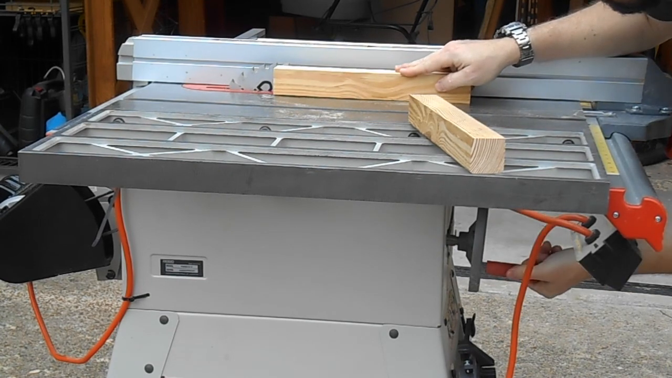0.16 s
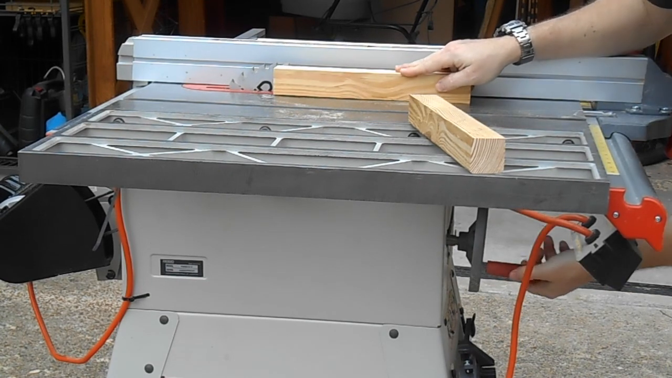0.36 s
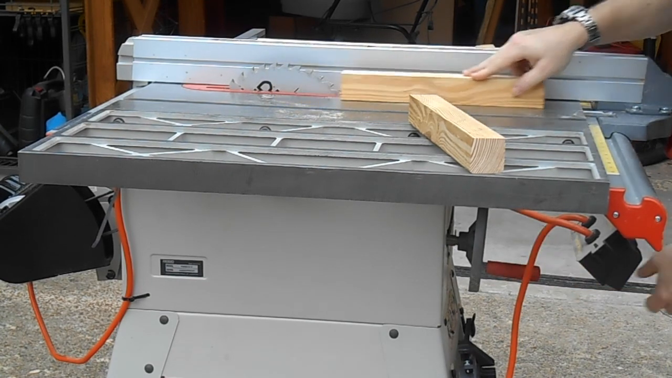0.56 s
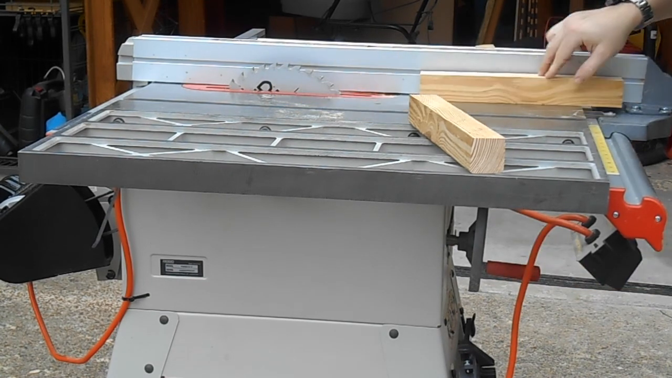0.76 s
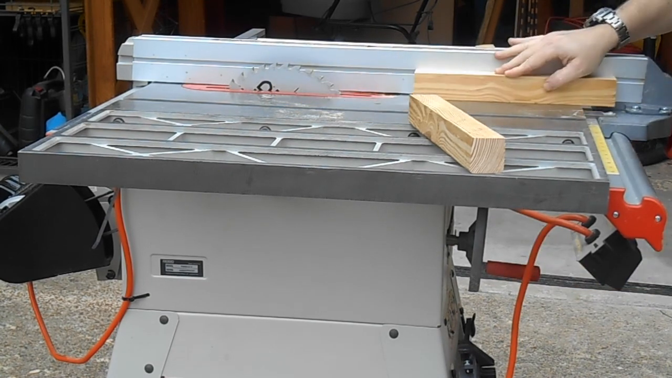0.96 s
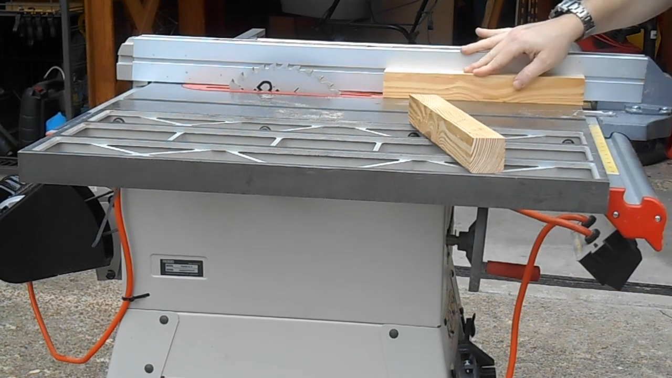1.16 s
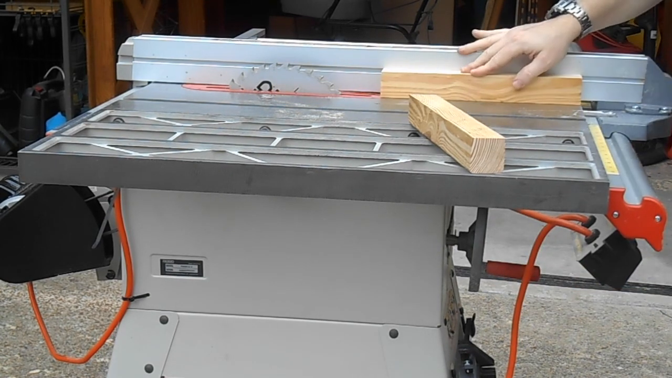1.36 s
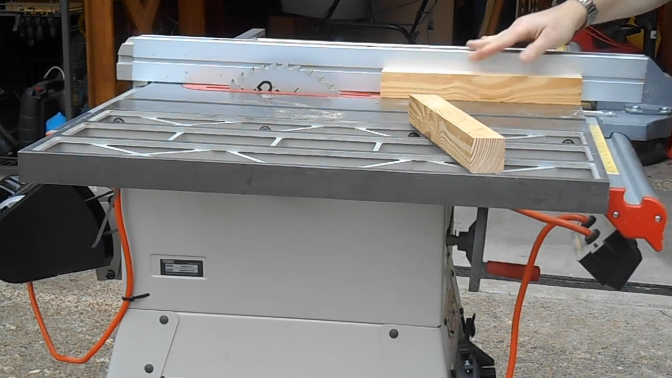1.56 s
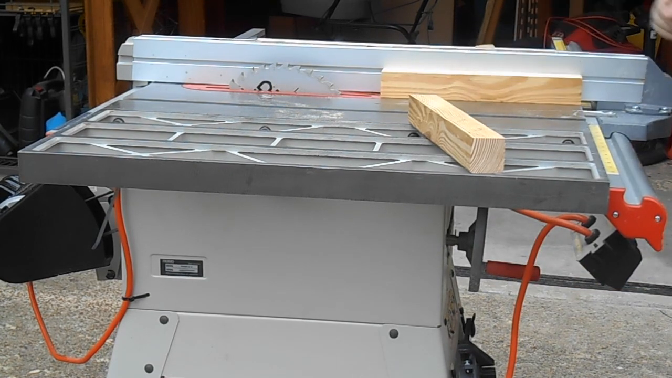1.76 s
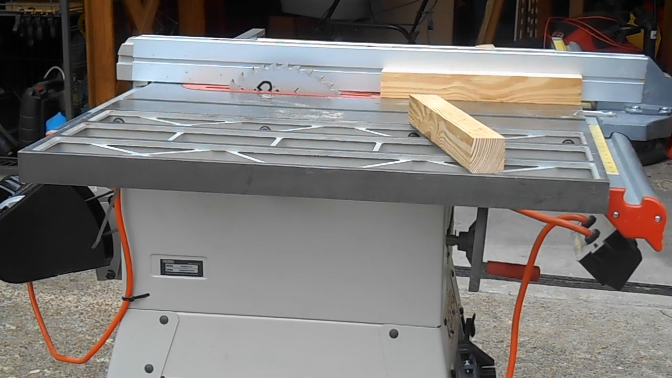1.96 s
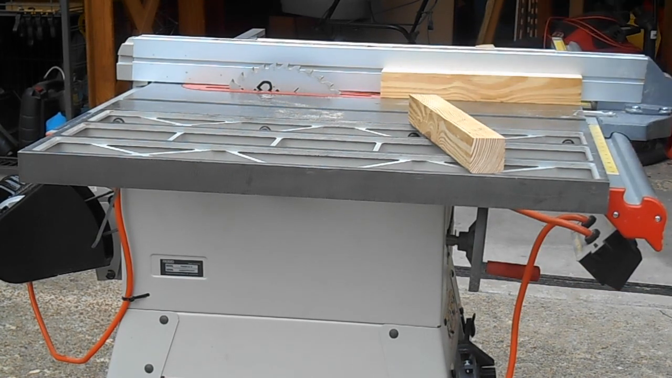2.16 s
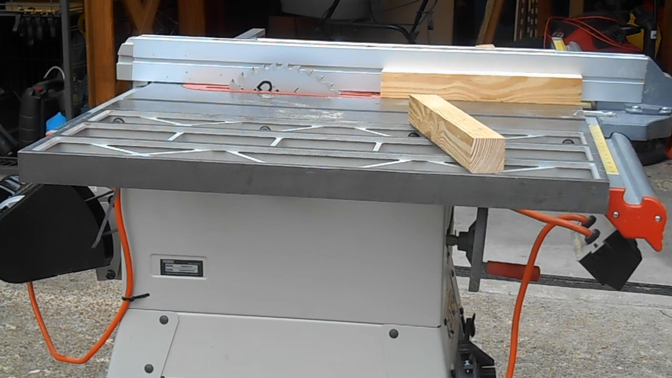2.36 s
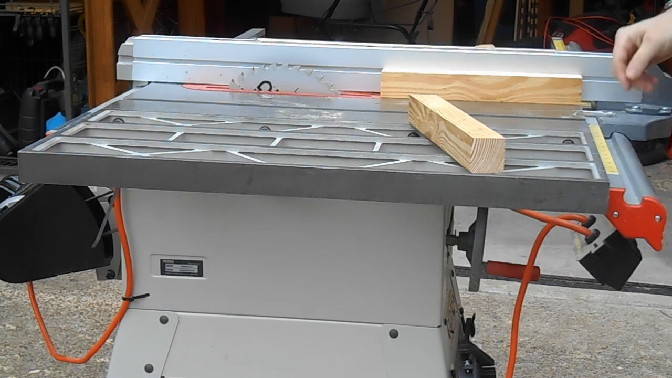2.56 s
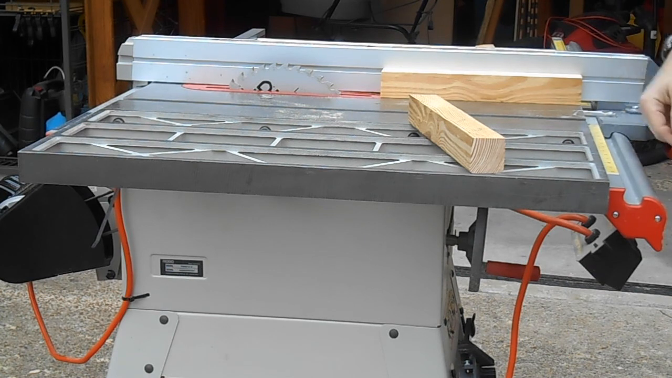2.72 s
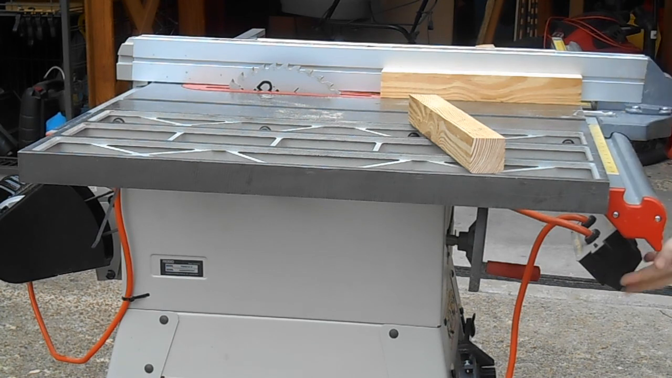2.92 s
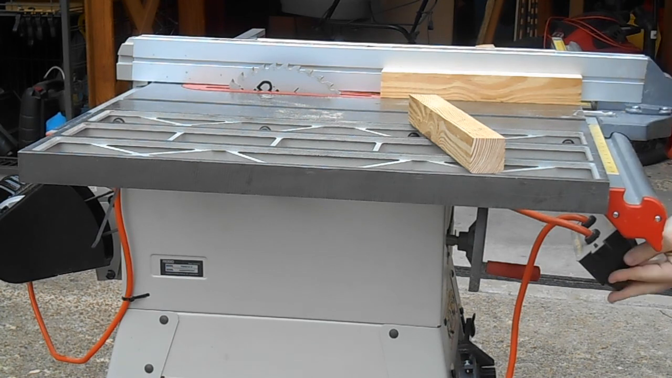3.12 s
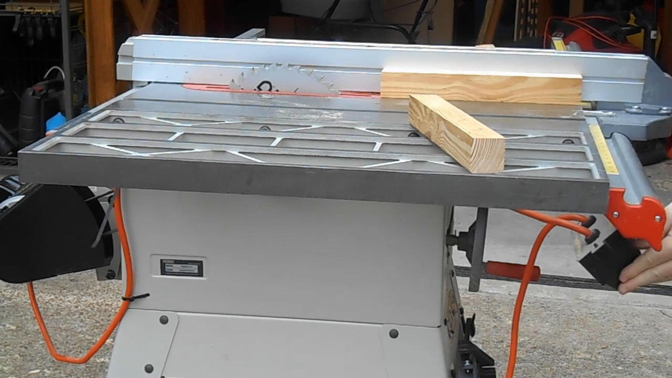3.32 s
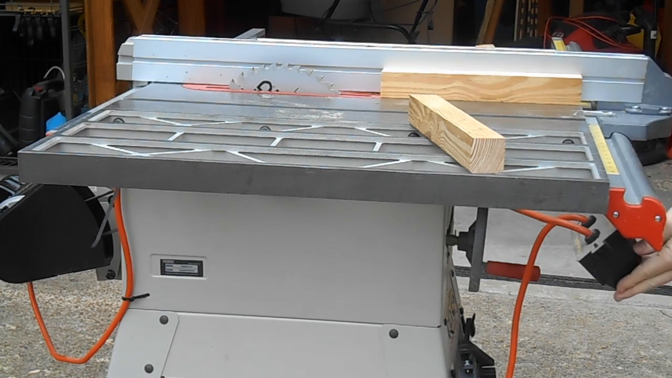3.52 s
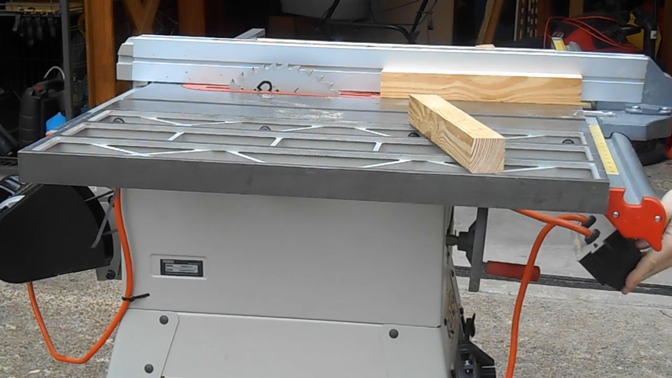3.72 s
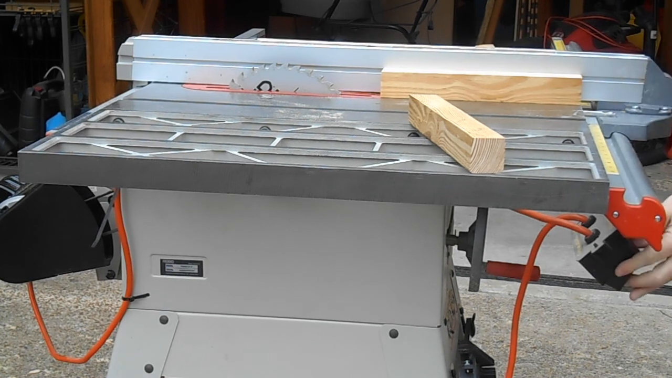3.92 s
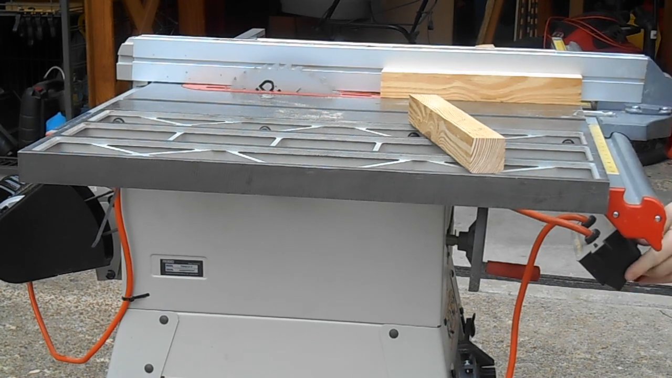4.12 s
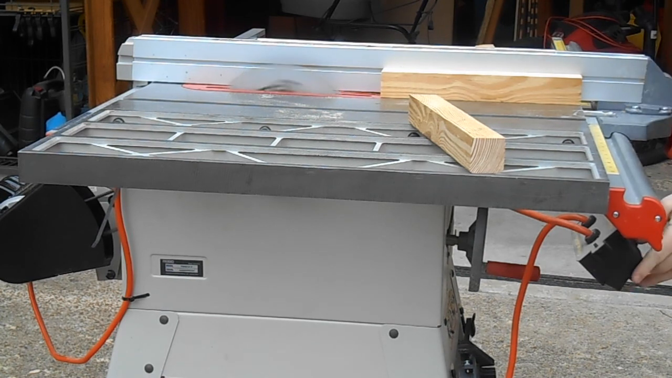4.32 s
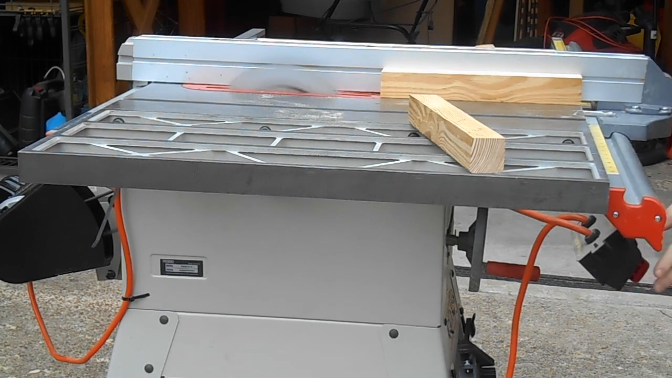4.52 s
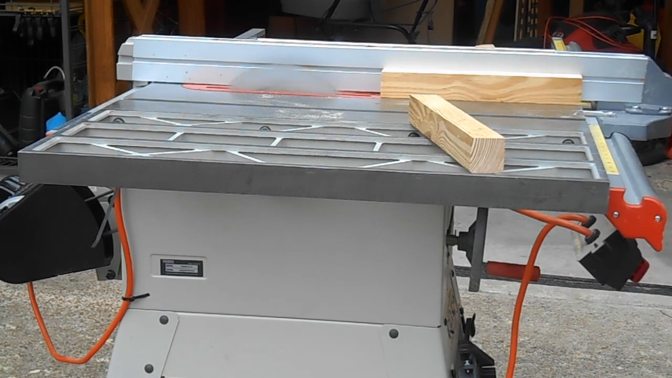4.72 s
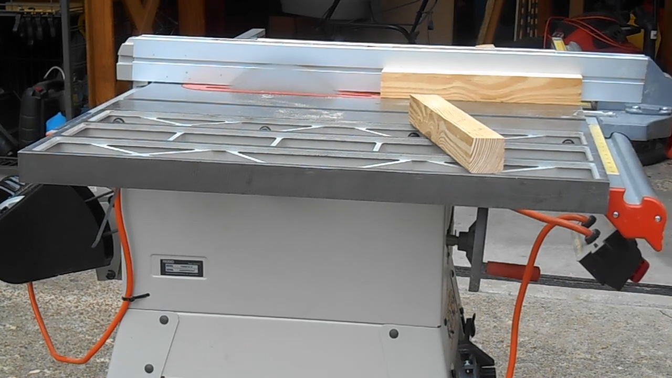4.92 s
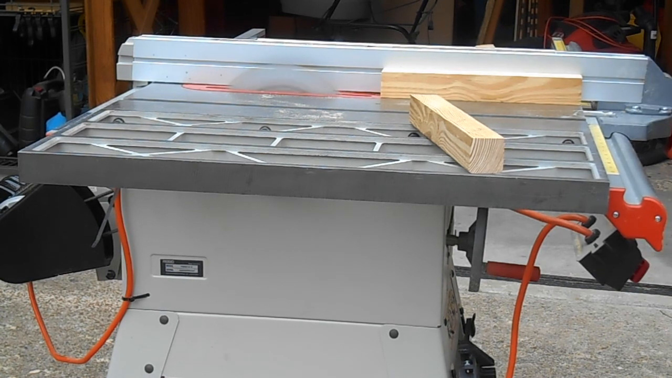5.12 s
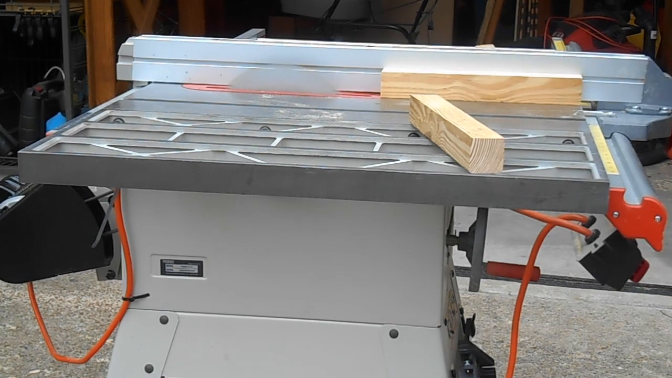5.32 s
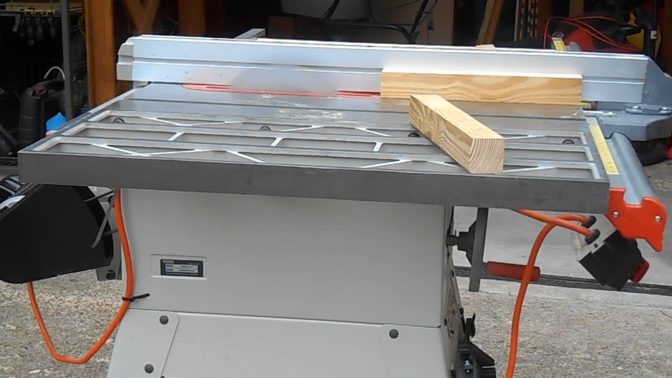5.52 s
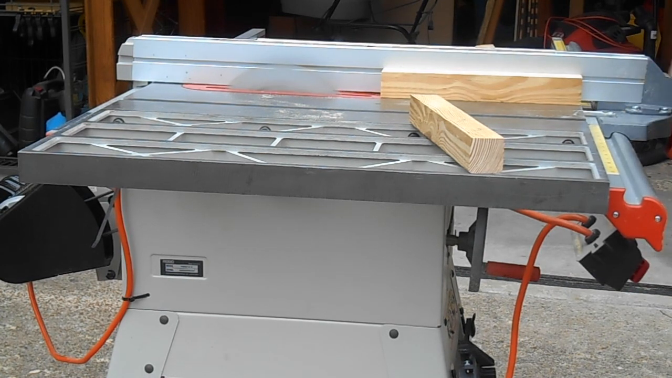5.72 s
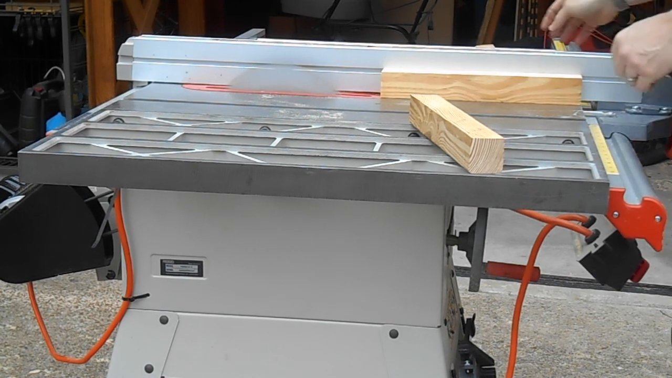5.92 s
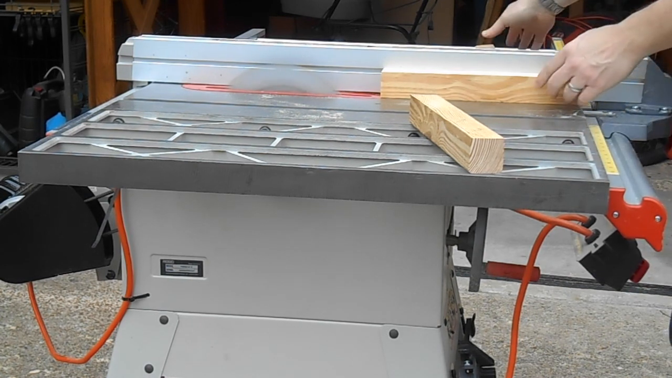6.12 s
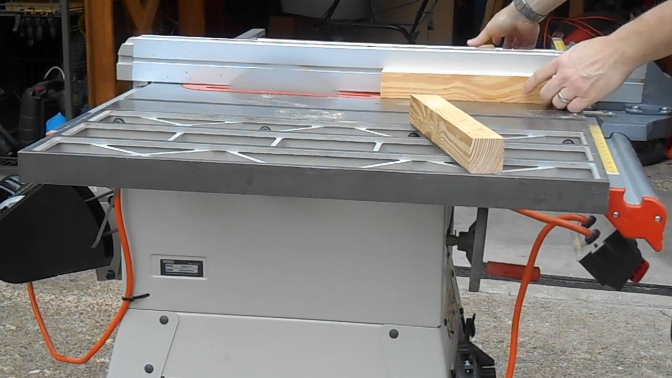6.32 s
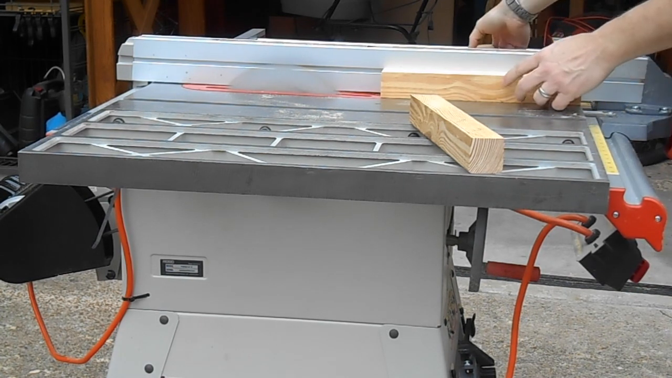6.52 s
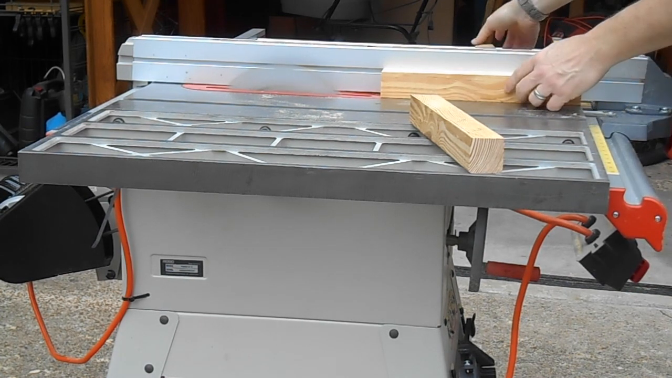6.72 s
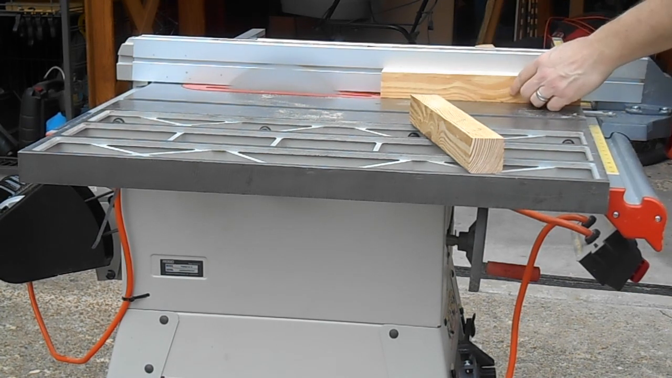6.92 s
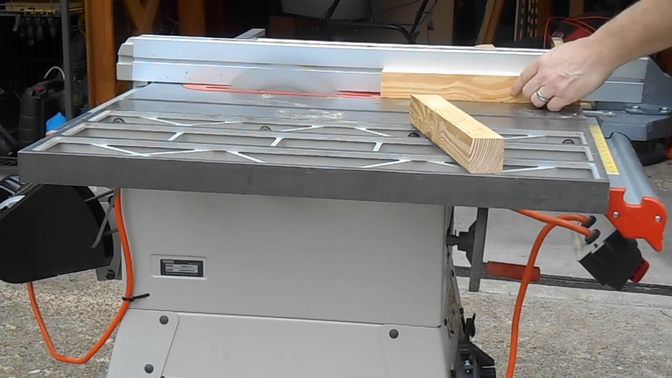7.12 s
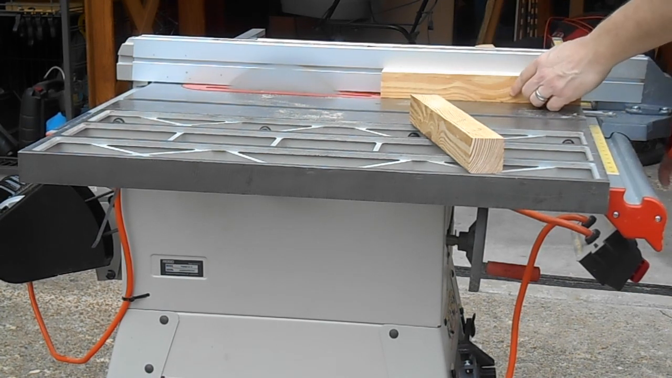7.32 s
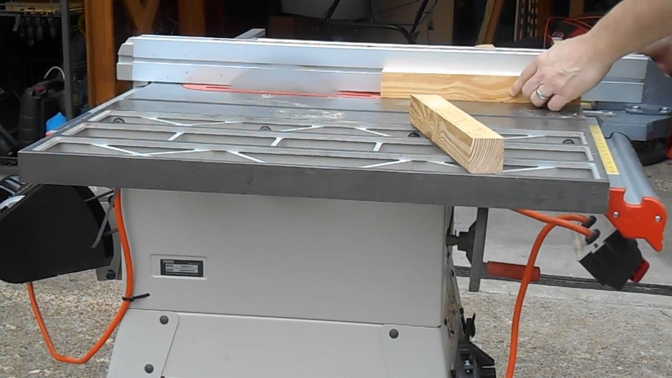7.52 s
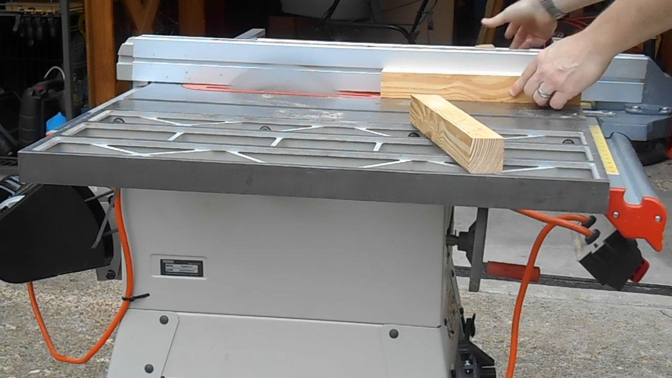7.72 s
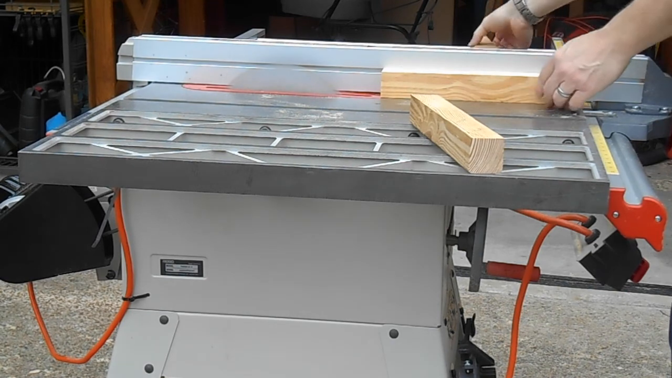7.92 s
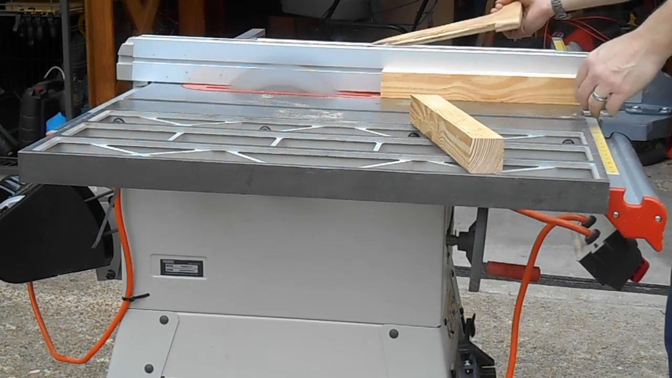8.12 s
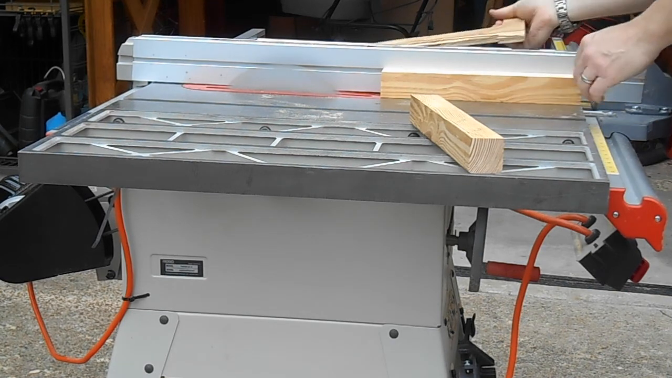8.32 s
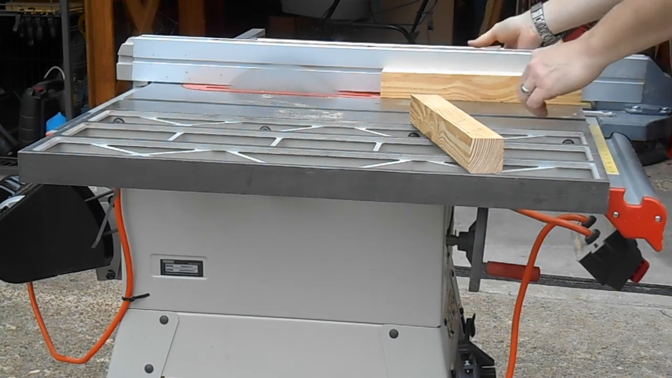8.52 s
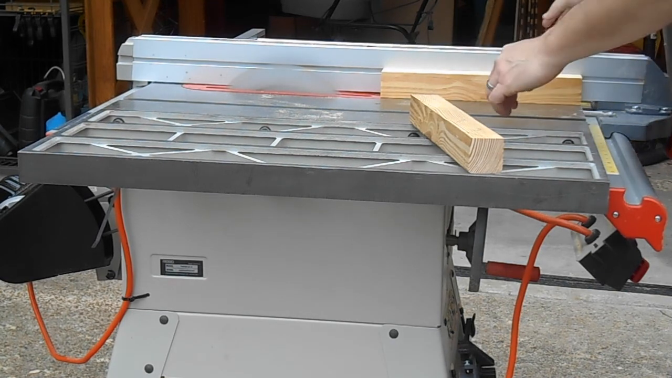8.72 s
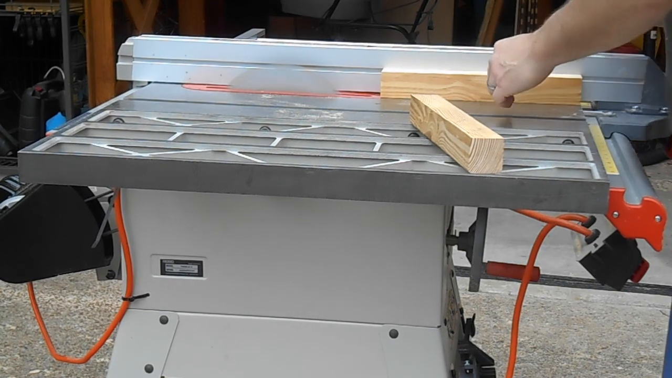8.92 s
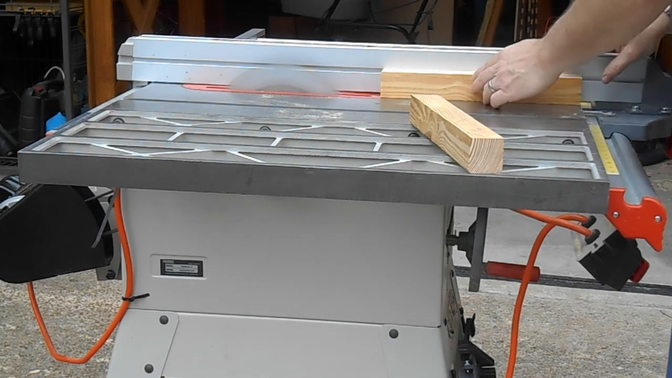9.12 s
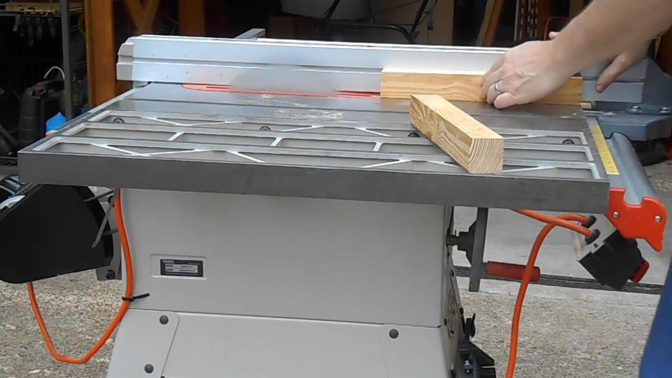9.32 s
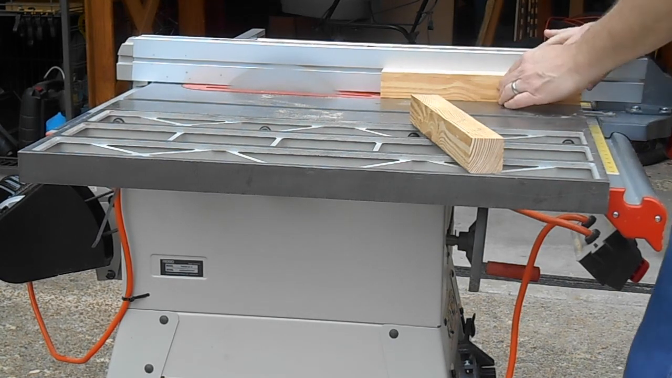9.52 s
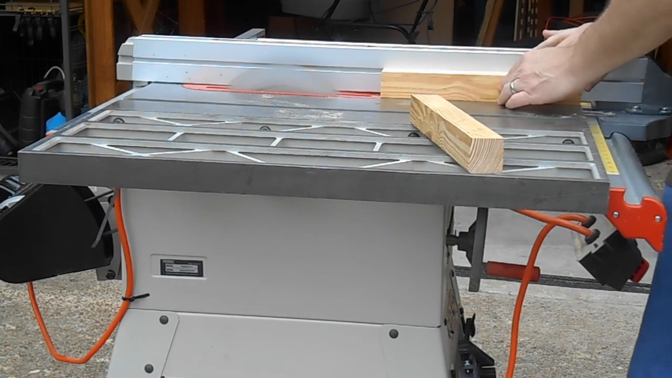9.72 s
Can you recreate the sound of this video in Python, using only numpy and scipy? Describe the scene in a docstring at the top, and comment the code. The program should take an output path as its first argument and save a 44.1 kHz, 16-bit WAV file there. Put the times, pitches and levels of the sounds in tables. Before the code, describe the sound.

Faint street wash and a light wind rumble on the microphone lie under the whole scene, at an open garage door with a short echo. From about 0.4 seconds a wooden board scrapes across a metal saw table and lands with a ringing knock at 1 second. Shoes scuff and crunch on grit with small clicks until about 4 seconds, most strongly around 2.3. At 4.2 seconds a switch snaps loudly and a table saw starts. The motor hums, the cabinet panels growl and the pitch climbs, with a brief metallic chatter and rasp between 4.6 and 5 seconds. By 5 seconds the blade is at full speed. It spins free without cutting, a loud, steady high whistle over rushing air, until the end at about 10 seconds. One more sharp snap sounds over it at around 8.5 seconds.

```python
"""A table saw starts and runs free: its teeth whistle in the air over the rush the blade drags along. First a
board is slid and knocked on the table, feet grate on grit and a switch snaps. The motor hums and winds up,
panels growl, the starting switch chatters; near the end a push stick clacks on the table. The saw stands at an
open garage door: a short echo behind it, street wash and wind outside."""
import sys
import numpy as np
from scipy import signal
from scipy.fft import rfft, irfft
from scipy.io import wavfile
from scipy.ndimage import uniform_filter1d

SR = 44100
rng = np.random.default_rng(int(sys.argv[2]) if len(sys.argv) > 2 else 0)


def pcm_store(signal):
    """Save signal as 16-bit PCM."""
    levels = np.round(np.clip(np.atleast_2d(signal), -1, 1) * 32767)
    wavfile.write(sys.argv[1], SR, levels.astype(np.int16).T)


N = 434826

START_S, SPIN_UP_S, SHAFT_HZ = 4.256, 0.75, 59.86
# cabinet panel modes: f/Hz, width/Hz, relative level/dB
PANEL_MODES = [(324, 41, -1.5), (456.7, 8.5, 5.5), (956, 83, 10), (1277, 120, 0), (1690, 160, 3)]


def gain_of(db):
    """Decibels to a factor."""
    return 10 ** (np.asarray(db) / 20)


def unit_rms(x):
    """Scales to rms 1."""
    return x / np.sqrt(np.mean(x ** 2) + 1e-20)


def at_peak(x, db):
    """Scales to a peak level."""
    return gain_of(db) * x / abs(x).max()


def curve_db(points, hz):
    """Interpolates a spectrum on a log frequency axis."""
    f, db = np.transpose(points)
    return np.interp(np.log(hz + 1), np.log(f + 1), db)


def add(mix, start_s, sound):
    """Mixes a sound in at start_s."""
    part = mix[round(start_s * SR):][:len(sound)]
    part += sound[:len(part)]


def resonate(x, hz, width_hz):
    """Unit-gain resonance; hz may glide."""
    carrier = np.exp(2j * np.pi * np.cumsum(hz * np.ones(len(x))) / SR)
    pole = np.exp(-np.pi * width_hz / SR)
    return 2 * (carrier * signal.lfilter([1 - pole], [1, -pole], x / carrier + 1e-18)).real


def noise_band(count, hz, *widths_hz):
    """Unit-rms noise through one resonance per width."""
    band = rng.standard_normal(count)
    for width_hz in widths_hz:
        band = resonate(band, hz, width_hz)
    return unit_rms(band)


def shaped(x, shape_db, size=2048):
    """Colours x by shape_db(f/Hz, t/s), each frame at unit power gain."""
    frames = dict(fs=SR, nperseg=size, noverlap=3 * size // 4)
    hz, t, spectra = signal.stft(x, **frames)
    gain = gain_of(shape_db(hz[:, None], t[None]))
    gain /= np.sqrt(np.mean(gain ** 2, axis=0))
    return signal.istft(spectra * gain, **frames)[1][:len(x)]


def stroke(length_s):
    """Progress 0-1 and a soft-ended window."""
    count = round(length_s * SR)
    return np.arange(count) / count, signal.windows.tukey(count, min(1, 600 / count))


def speed_at(t):
    """Shaft speed as a share of full speed; rises evenly."""
    return np.clip((t - START_S) / SPIN_UP_S, 0.02, 1)


def street(start_db=-49, rise_db_per_s=1.3, whine_db=-51.5):
    """Far wash, slowly growing, with a faint whine in it."""
    # wash spectrum: f/Hz, relative density/dB
    spectrum = [(100, -53), (170, -7), (430, -6.5), (500, -4.5), (1000, -3), (1900, -5), (2800, -5),
                (5000, -10), (9000, -15.5), (14000, -36)]
    # far whines: t/s, length/s, start f/Hz, end f/Hz
    whines = [(2.066, 0.29, 2680, 2900), (2.498, 0.44, 2100, 2280), (3.1, 2.4, 2780, 2720)]
    wash = shaped(rng.standard_normal(N), lambda hz, s: curve_db(spectrum, hz))
    wash *= gain_of(start_db + rise_db_per_s * np.arange(N) / SR)
    for start_s, length_s, from_hz, to_hz in whines:
        u, _ = stroke(length_s)
        whine = noise_band(len(u), from_hz + (to_hz - from_hz) * u, 120)
        add(wash, start_s, gain_of(whine_db) * np.hanning(len(u)) ** 0.14 * whine)
    return wash


def wind(start_db=-51.5, drift_db_per_s=-0.1, lumps_db=2):
    """Lumpy wind rumbles on the microphone."""
    # rumble spectrum: f/Hz, relative density/dB
    spectrum = [(10, -7), (20, -8), (60, -5), (100, -2), (150, -13.5), (200, -24.5), (300, -58)]
    # gusts: t/s, length/s, level/dB
    gusts = [(1.045, 0.11, -36.5), (1.19, 0.063, -35)]
    strength = gain_of(start_db + drift_db_per_s * np.arange(N) / SR)
    for start_s, length_s, db in gusts:
        add(strength, start_s, gain_of(db) * np.hanning(round(length_s * SR)))
    rumble = shaped(rng.standard_normal(N), lambda hz, s: curve_db(spectrum, hz), size=4096)
    lumps = unit_rms(uniform_filter1d(rng.standard_normal(N), 2500))
    return strength * gain_of(lumps_db * lumps) * rumble


def garage_echo(x, t60_s=0.22, level_db=-10):
    """Diffuse tail of the garage."""
    t = np.arange(SR // 2) / SR
    tail = rng.standard_normal(len(t)) * gain_of(-60 * t / t60_s) * (t > 0.004)
    return gain_of(level_db) * signal.fftconvolve(x, tail / np.linalg.norm(tail))[:N]


def feet_on_grit(mix, grain_decay_s=0.00086):
    """Grains of unlike size crack under a sole, each with a short noisy tail."""
    # grit spectrum: f/Hz, relative density/dB
    spectrum = [(150, -20), (600, -5), (1500, -7), (2100, 2), (2600, -3), (3200, 1.5), (4300, -2),
                (6000, -6.5), (9500, -12.5), (14000, -21)]
    # scuffs: t/s, length/s, level/dB, change by the end/dB, grain rate/(1/s)
    scuffs = [(0.865, 0.14, -38.5, -9, 660), (1.14, 0.23, -39.5, -6, 1800), (1.376, 0.094, -39.5, 1, 570),
              (1.511, 0.16, -44.5, -10, 150), (1.938, 0.1, -37, -23, 640), (2.303, 0.24, -25, -26, 590),
              (2.911, 0.024, -34.5, -14, 1800), (2.951, 0.029, -37.5, -9, 2400),
              (3.624, 0.33, -48, -5, 200), (3.879, 0.04, -44.5, -5, 1200), (4.011, 0.037, -41.5, -4, 1200),
              (4.113, 0.059, -45.5, 16, 750)]
    for start_s, length_s, db, change_db, grains_per_s in scuffs:
        u, window = stroke(length_s)
        sizes = gain_of(7.9 * np.minimum(rng.exponential(1, len(u)), 2.6))
        grains = sizes * (rng.random(len(u)) < grains_per_s / SR)
        bursts = signal.lfilter([1], [1, -np.exp(-1 / (grain_decay_s * SR))], grains)
        cracks = (unit_rms(bursts) + 0.94) * rng.standard_normal(len(u))
        crunch = shaped(unit_rms(cracks), lambda hz, s: curve_db(spectrum, hz), size=256)
        add(mix, start_s, gain_of(db + change_db * u ** 2) * window * crunch)


def board_slides(mix, sag_share=0.054, peak_share=0.26, flicker_db=3.6):
    """Stick-slip noise rings the board and table ribs; the pitch sags as the stroke slows."""
    # board and rib modes: f/Hz, width/Hz, relative level/dB
    modes = [(1010, 690, -1), (1850, 48, -3), (2120, 130, 0), (3790, 59, -1.5), (4300, 120, -1),
             (5580, 90, -6), (6550, 200, -7), (7440, 190, 1.5), (9600, 730, -4.5)]
    # strokes: t/s, length/s, relative level below 3 kHz/dB, above/dB
    strokes = [(0.417, 0.41, -36, -37.5), (0.794, 0.19, -37, -48), (1.03, 0.17, -39.5, -43.5)]
    for start_s, length_s, low_db, treble_db in strokes:
        u, window = stroke(length_s)
        pitch = 1 - sag_share * (u - peak_share)
        scrape = np.zeros(len(u))
        for hz, width_hz, db in modes:
            rub, contact = rng.standard_normal((2, len(u)))
            ring = unit_rms(resonate(rub, hz * pitch, width_hz) + 0.14 * resonate(rub, hz, 1700))
            contact_db = flicker_db * unit_rms(uniform_filter1d(contact, 1800))
            scrape += gain_of(db + (low_db if hz < 3000 else treble_db) + contact_db) * ring
        push_db = np.interp(u, [0, peak_share, 0.69, 1], [-25, -7, -10, -17.5])
        add(mix, start_s, gain_of(push_db) * window * scrape)


def knocks(mix, attack_s=0.0013, blur_share=0.16):
    """Two short ringing knocks: the board hits the table, later the switch clunks."""
    # knock modes, each a dying tone blurred by noise: f/Hz, relative level/dB, t60/s
    modes = [(451, -14, 0.14), (716, -8, 0.16), (1035, -4, 0.1), (1400, 14, 0.018), (1550, -1, .07),
             (2040, 2, 0.045), (2640, -13, 0.068), (4030, -8, .04), (4870, -19, 0.2)]
    # blows: t/s, peak/dB, pitch factor
    blows = [(0.9957, -9, 1.0), (4.168, -19, 1.1)]
    t = np.arange(9000) / SR
    for start_s, peak_db, pitch in blows:
        ring = np.zeros(len(t))
        for hz, db, t60_s in modes:
            tone = np.sin(2 * np.pi * hz * pitch * t)
            blur = noise_band(len(t), hz * pitch, blur_share * hz, 10 * blur_share * hz)
            ring += gain_of(db - 60 * t / t60_s) * (tone + 0.67 * blur)
        add(mix, start_s, at_peak(ring * np.minimum(t / attack_s, 1), peak_db))


def ticks(mix, puff_t60_s=0.015, tail_t60_s=0.046):
    """A click and a puff of noise through a wide resonance, too small to make bass."""
    # dry ticks, snaps and clacks: t/s, peak/dB, f/Hz
    snaps = [(0.876, -29, 1800), (0.891, -24, 3200), (0.897, -12.5, 1690), (0.907, -18, 3300),
             (0.916, -17, 1890), (1.148, -23, 2600), (1.162, -18, 3600), (1.171, -21, 3500),
             (1.19, -22, 4000), (1.2, -19, 3800), (1.216, -18, 2900), (1.227, -19, 3800),
             (1.237, -24, 4500), (1.247, -20, 5000), (1.255, -23, 4000), (1.273, -18, 3000),
             (1.278, -19, 3500), (1.293, -25, 3500), (1.318, -18, 2680), (1.3265, -15.5, 4040),
             (1.433, -20, 2080), (1.538, -22.5, 4160), (1.572, -23, 2200), (1.6265, -6.5, 3830),
             (1.637, -31, 4500), (1.642, -32, 4300), (1.696, -32, 5500), (1.709, -26, 4500),
             (1.7432, -13.5, 4870), (1.943, -14.5, 4080), (2.279, -27, 4500), (2.309, -13, 3800),
             (2.314, -12, 3500), (2.3535, -9, 3200), (2.366, -12, 3300), (2.39, -15, 3190),
             (2.428, -12.5, 3200), (2.44, -18, 3300), (2.454, -26, 3400), (3.631, -18.5, 3360),
             (3.67, -25.5, 5500), (3.755, -27.5, 1170), (3.825, -17, 3630), (4.1658, -6, 4970),
             (4.1673, -1, 3970), (4.1677, -4, 4200), (4.169, 0, 4230), (4.173, -9, 3000),
             (4.265, -19.5, 5040), (8.551, -1, 1840), (8.551, -5, 5350), (8.554, 0.5, 4600),
             (8.561, -5, 2400), (8.563, -1, 4900)]
    t = np.arange(4000) / SR
    decay = 0.35 * gain_of(-60 * t / puff_t60_s) + 0.14 * gain_of(-60 * t / tail_t60_s)
    for start_s, peak_db, hz in snaps:
        snap = rng.standard_normal(len(t)) * decay
        snap[0] = 4.5  # the click
        ring = resonate(resonate(snap, hz, 0.55 * hz), hz, 1.4 * hz)
        thin = signal.lfilter(*signal.butter(2, 0.27 * hz, "high", fs=SR), ring)
        add(mix, start_s, at_peak(thin, peak_db))


def panel_jolt(mix, start_s=4.172, peak_db=-33):
    """The switch's snap rings the cabinet panels, narrow modes longest."""
    t = np.arange(9000) / SR
    ring = sum(gain_of(db) / width_hz * np.exp(-np.pi * width_hz * t) * np.sin(2 * np.pi * hz * t)
               for hz, width_hz, db in PANEL_MODES)
    add(mix, start_s, at_peak(ring, peak_db))


def switch_chatter(mix, hit_t60_s=0.017, tail_t60_s=0.25):
    """The motor's starting switch chatters open; small steel parts ring."""
    # steel modes: f/Hz, width/Hz, relative level/dB
    modes = [(5800, 680, 6), (6740, 450, 5), (8000, 500, -2), (9100, 1100, -14)]
    # bounces: t/s, peak/dB
    bounces = [(4.618, -19), (4.634, -23), (4.684, -24), (4.7012, -20), (4.727, -14.5), (4.748, -7),
               (4.775, -11), (4.834, -17)]
    t = np.arange(6000) / SR
    decay = gain_of(-60 * t / hit_t60_s) + 0.36 * gain_of(-60 * t / tail_t60_s)
    for start_s, peak_db in bounces:
        rattle = rng.standard_normal(len(t)) * decay
        ring = sum(gain_of(db) * unit_rms(resonate(rattle, hz, width_hz)) for hz, width_hz, db in modes)
        add(mix, start_s, at_peak(ring, peak_db))


def switch_rasp(mix, start_s=4.75, length_s=0.3, level_db=-32.5, catches_per_s=900):
    """The starting switch rubs until full speed; its steel sings."""
    # rubbed modes: f/Hz, width/Hz, relative level/dB
    modes = [(3820, 200, -1), (5600, 270, 0)]
    u, window = stroke(length_s)
    catches = (rng.random(len(u)) < catches_per_s / SR) * rng.standard_normal(len(u))
    ring = sum(gain_of(db) * unit_rms(resonate(catches, hz, width_hz)) for hz, width_hz, db in modes)
    add(mix, start_s, gain_of(level_db) * window * ring)


def moan(mix, start_s=4.44, length_s=0.17, from_hz=470, to_hz=600, level_db=-43):
    """A fuzzy tone climbs as the shaft gains speed."""
    u, _ = stroke(length_s)
    tone = noise_band(len(u), from_hz + (to_hz - from_hz) * u, 37)
    add(mix, start_s, gain_of(level_db) * np.hanning(len(u)) ** 0.21 * tone)


def motor_hum(t, speed, hum_hz=120, kick_end_s=4.39):
    """Windings hum hardest while the motor pulls; shaken panels growl most in the first kick."""
    # hum lines: multiple of hum_hz, relative level/dB
    harmonics = [(1, -17), (4, -8), (6, -4), (8, 0)]
    # motor pull: t/s, gain/dB
    pull = [(4.25, -40), (4.28, -36), (4.39, -39.5), (4.43, -43.5), (4.6, -38), (4.8, -36), (4.93, -29.5),
            (5.0, -40), (5.2, -66)]
    hum = sum(gain_of(db) * noise_band(len(t), k * hum_hz, 20) for k, db in harmonics)
    growl = sum(gain_of(db) * noise_band(len(t), hz, width_hz, 36 * width_hz)
                for hz, width_hz, db in PANEL_MODES)
    growl_db = -7.5 - 6 * np.clip((t - kick_end_s) / 0.045, 0, 1)
    pull_db = np.interp(t, *np.transpose(pull))
    return gain_of(pull_db) * (hum * speed ** 0.7 + gain_of(growl_db) * growl)


def shaft_tones(t, speed, step_gain, swell_period_s=3.03):
    """Blurred lines and two clean swelling tones follow the shaft, emerging near full speed."""
    # blurred lines: shaft multiple, relative level/dB, width/Hz
    lines = [(4, -58, 6), (72.96, -47, 5), (73.5, -50, 5), (109.45, -39.5, 22), (111.46, -46, 30)]
    # clean tones: shaft multiple, mean level/dB, swing/dB, loudest t/s, rising share of cycle
    drones = [(5, -52, 6, 6.25, 0.088), (10, -44, 4, 8.12, 0.73)]
    tones = step_gain * sum(gain_of(db + 1.5) * noise_band(len(t), k * SHAFT_HZ * speed, width_hz)
                            for k, db, width_hz in lines)
    turns = np.cumsum(SHAFT_HZ * speed) / SR
    for k, db, swing_db, loudest_s, rising in drones:
        swell = signal.sawtooth(2 * np.pi * ((t - loudest_s) / swell_period_s + rising), rising)
        tones += np.sqrt(2) * gain_of(db + swing_db * swell) * np.sin(2 * np.pi * k * turns)
    return tones * speed ** 8


def cabinet_db(hz):
    """The steel cabinet and table colour the blade's air noise."""
    # peaks and notches: f/Hz, width/Hz, gain/dB
    bands = [(462, 72, 14.5), (610, 154, 5), (954, 71, 6), (1094, 26, -21), (1640, 166, -4),
             (1950, 156, -3.5), (2033, 110, 7.5), (2215, 43, -13), (2394, 27, 2.5), (2440, 20, 7),
             (2482, 43, -8.5), (3206, 43, -20), (3208, 180, 9.5), (3950, 72, 5)]
    return sum(db / (1 + (2 * (hz - f) / width_hz) ** 2) for f, width_hz, db in bands)


def blade_rush(t, speed, strain, full_db=-20.5, strain_db=7, shudder_db=-40.5, shudder_t60_s=1.9):
    """Air dragged by the blade grows with speed; the machine shudders as it starts."""
    # rush spectrum: f/Hz, relative density/dB
    spectrum = [(100, -69), (160, -34), (600, -29.5), (1100, -16), (1450, -8.5), (1900, -11.5),
                (2400, -5.5), (3500, -16), (9000, -22), (14000, -36.5)]
    air = shaped(rng.standard_normal(len(t)), lambda hz, s: curve_db(spectrum, hz) + cabinet_db(hz))
    drag = gain_of(full_db + strain_db * strain) * speed ** 3.13
    shudder = gain_of(shudder_db - 60 * (t - START_S) / shudder_t60_s)
    return air * np.hypot(drag, shudder)


def tooth_whistle(t, speed, strain, full_db=-14, strain_db=3.5, lock_speeds=(0.6, 0.7)):
    """Eddies shed by the teeth lock into a whistle, lower and narrower while the shaft is slow."""
    # whistle at full speed: f/Hz, relative density/dB
    spectrum = [(1300, -42), (1900, -26.5), (2200, -4), (2340, 2.5), (2440, 2), (2520, 0.5), (2800, -12),
                (3400, -34.5), (4500, -57)]

    def shape_db(hz, elapsed_s):
        frame_speed = speed_at(t[0] + elapsed_s)
        return curve_db(spectrum, hz / frame_speed) * np.sqrt(2 - frame_speed) + cabinet_db(hz)

    eddies = shaped(rng.standard_normal(len(t)), shape_db)
    lock_db = np.interp(speed, lock_speeds, [-12, 0])
    return eddies * gain_of(full_db + strain_db * strain + lock_db) * speed ** 2.9


def saw(mix, attack_s=0.0049, ease_s=0.075, step_s=0.034, recover_s=0.38):
    """The motor spins the blade up, louder until its strain eases just short of full speed."""
    # the level steps up or down and creeps back: t/s, change/dB
    steps = [(5.06, 1.5), (5.49, -2.5), (8.58, -3.5)]
    t = np.arange(round(START_S * SR), N) / SR
    speed = speed_at(t)
    strain = np.exp(-np.maximum(t - START_S - 0.946 * SPIN_UP_S, 0) / ease_s)
    step_gain = gain_of(sum(db * np.clip((t - s) / step_s, 0, 1) * np.exp(-abs(t - s) / recover_s)
                            for s, db in steps))
    air = tooth_whistle(t, speed, strain) + blade_rush(t, speed, strain)
    running = step_gain * air + shaft_tones(t, speed, step_gain) + motor_hum(t, speed)
    add(mix, START_S, np.minimum((t - t[0]) / attack_s, 1) * running)


def scene():
    """Handling with its echo, the machine and the open air, in mono."""
    handling, machine = np.zeros((2, N))
    board_slides(handling)
    feet_on_grit(handling)
    ticks(handling)
    switch_chatter(machine)
    knocks(handling)
    for source in (saw, panel_jolt, moan, switch_rasp):
        source(machine)
    return (handling + garage_echo(handling) + machine + street() + wind())[None]


def record(dry, ceiling=0.95, cutoff_hz=13940):
    """The microphone loses top treble and dips near 11 kHz; peaks are rounded, the band limited."""
    # microphone response: f/Hz, gain/dB
    response = [(9000, -1), (10200, -1.5), (10900, -14), (11300, -11.5), (12100, -5.5), (13000, -15),
                (14000, -22)]
    coloured = irfft(rfft(dry) * gain_of(curve_db(response, np.fft.rfftfreq(N, 1 / SR))), N)
    rounded = coloured / (1 + (abs(coloured) / ceiling) ** 6) ** (1 / 6)
    lowpass = signal.firwin(511, cutoff_hz, window=("kaiser", 9), fs=SR)
    return signal.oaconvolve(rounded, lowpass[None], "same")


dry = scene()
out = record(dry)
pcm_store(out)
```